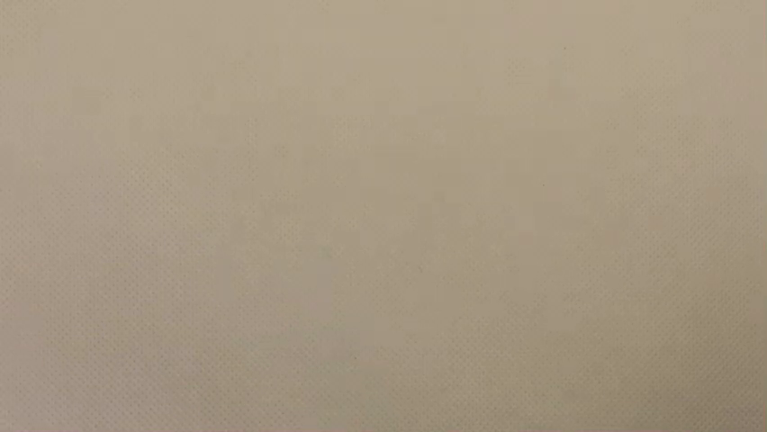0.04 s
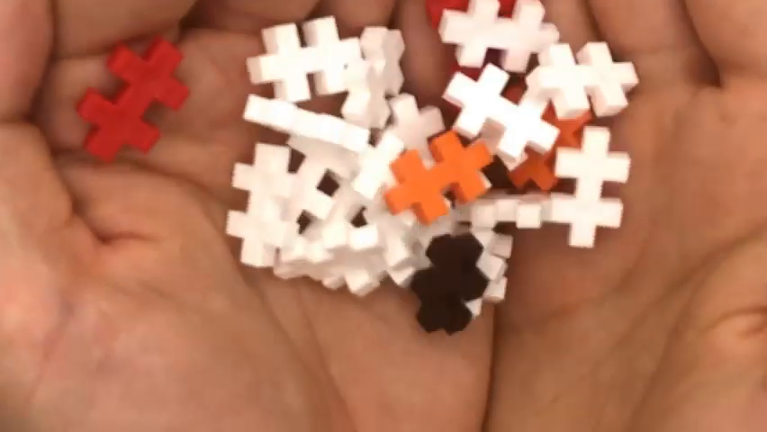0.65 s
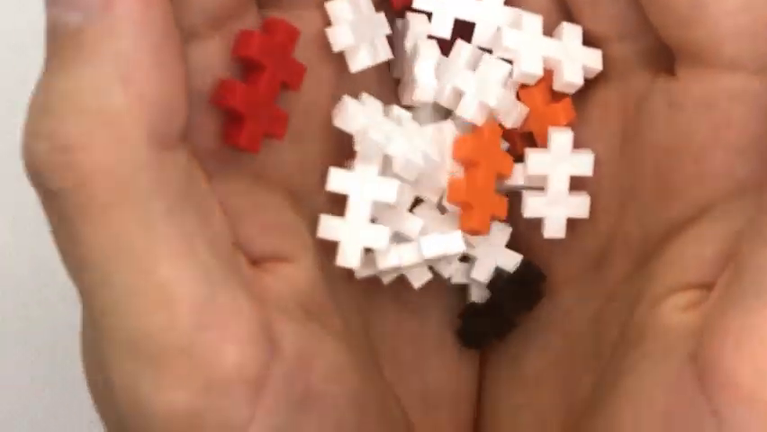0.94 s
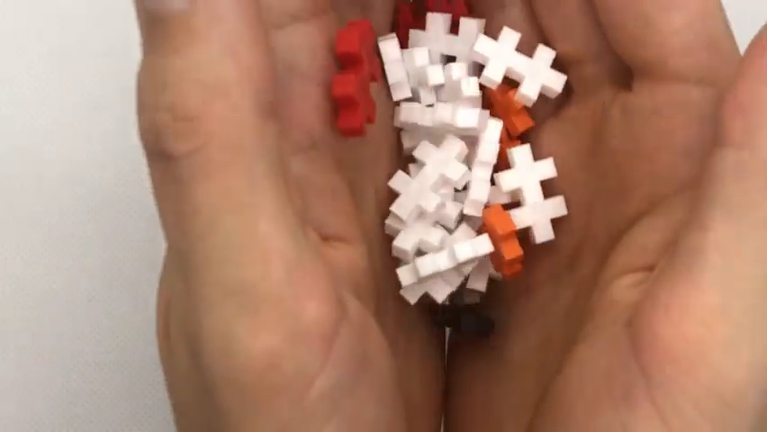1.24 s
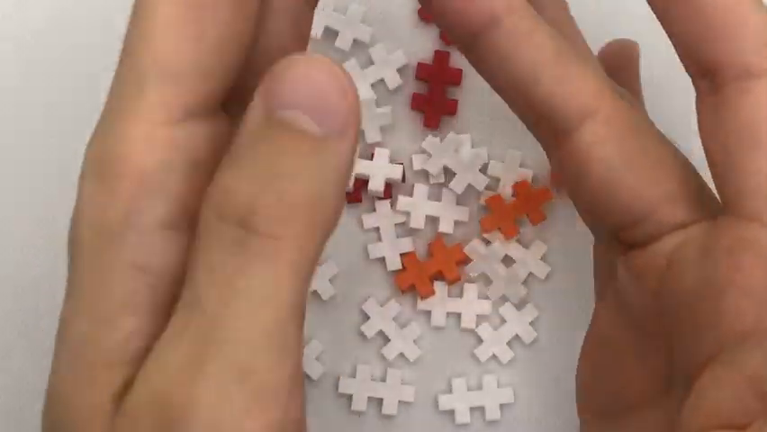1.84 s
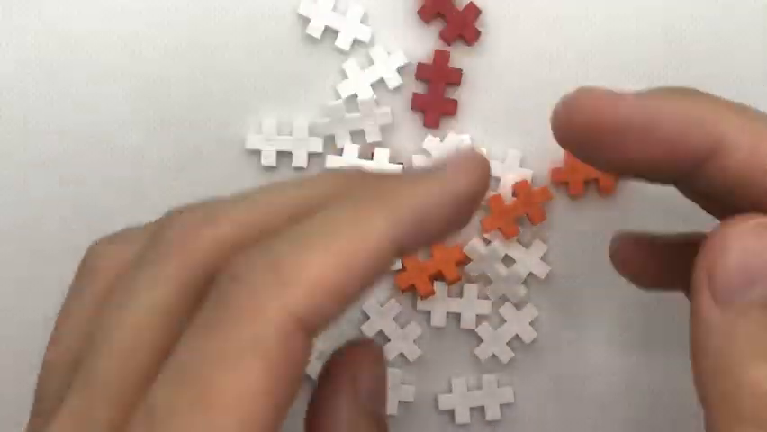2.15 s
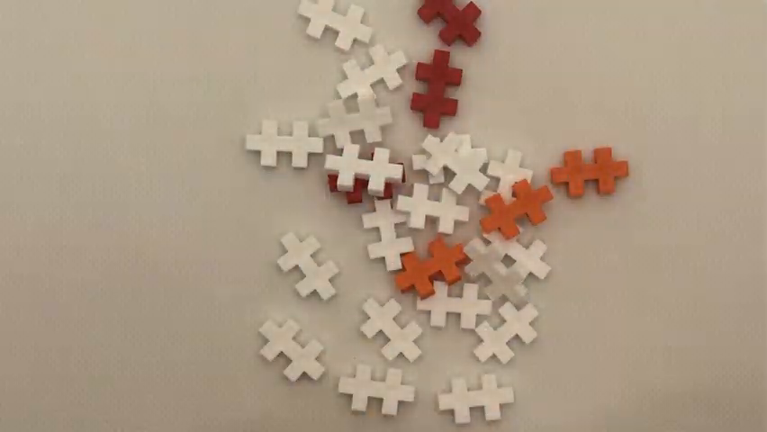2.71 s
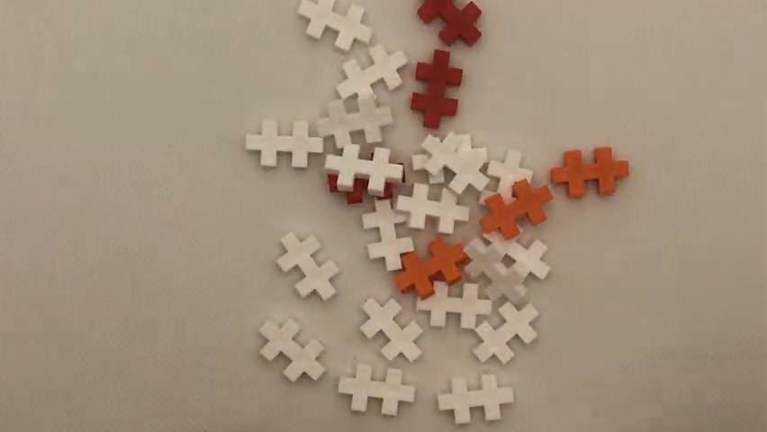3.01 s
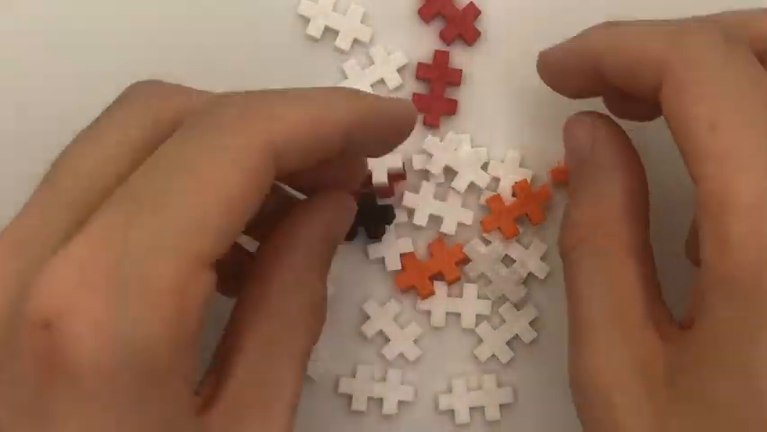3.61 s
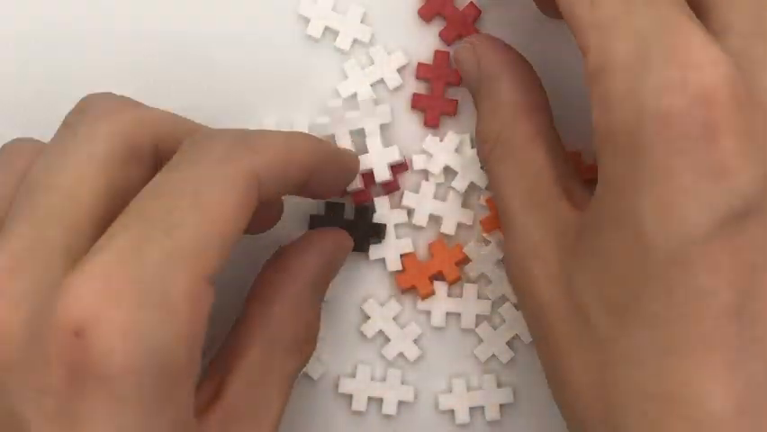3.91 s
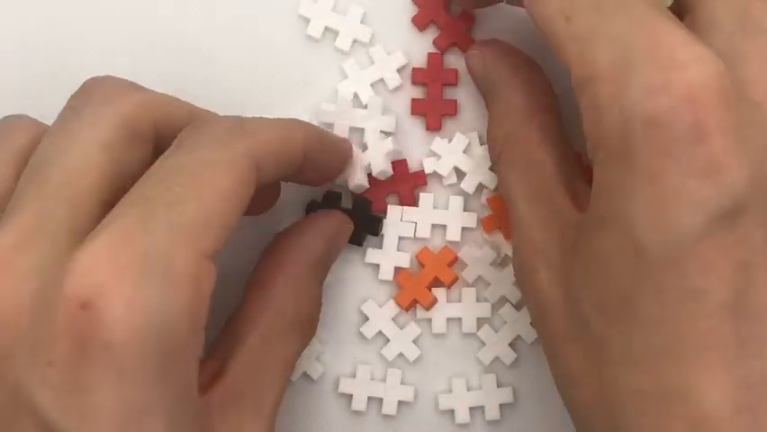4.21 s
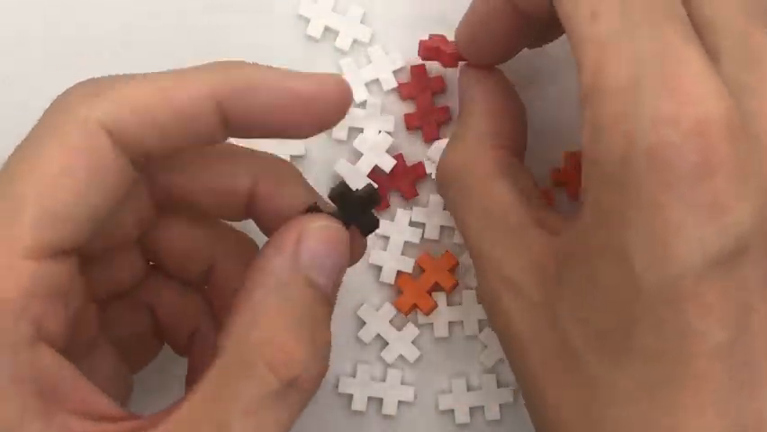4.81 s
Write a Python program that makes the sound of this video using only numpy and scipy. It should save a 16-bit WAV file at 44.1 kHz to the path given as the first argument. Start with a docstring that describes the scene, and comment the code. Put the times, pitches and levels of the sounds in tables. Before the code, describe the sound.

A handful of little plastic pieces shifts softly, drops on a table in a short clatter, and is lightly pushed around.

```python
"""Small plastic building pieces pour onto a tabletop, after shifting in cupped hands; fingertips then nudge them.
Each impact on the table excites the board's bending modes, which ring briefly. Piece on piece gives
a thin bright click, and stick-slip friction makes the pieces rustle and scrape. Underneath, the table
rumbles under the hands and sleeves brush by, close to one microphone in a quiet small room."""
import sys
import numpy as np
from scipy import signal
from scipy.fft import rfft, irfft
from scipy.io import wavfile

SR = 44100
rng = np.random.default_rng(int(sys.argv[2]) if len(sys.argv) > 2 else 0)


def store_pcm(level_fs):
    """Save levels as 16-bit WAV."""
    pcm = np.round(np.clip(level_fs, -1, 1) * 32767).astype(np.int16)
    wavfile.write(sys.argv[1], SR, np.atleast_2d(pcm).T)


N = 222741
T = np.arange(6000) / SR  # time axis of one impact

# pieces striking the table: start_s, level_db, hardness_db, spot_ring_db, crack_pitch_hz
TABLE_IMPACTS = [(1.379, -34.5, -10, -7, 3100), (1.3924, -35, -10, -0.5, 2370), (1.4056, -47, 1, -12, 5300),
                 (1.422, -41.5, -3.5, -11, 2424), (1.4395, -40, -8, -4, 2250),
                 (1.4428, -42.5, -3, 10, 2335), (1.4501, -41.5, 2, 10, 2250), (1.4577, -36, -7, -3, 2450),
                 (1.4639, -33.5, -3, -1.5, 2710), (1.4704, -39.5, 2, 6, 2350), (1.479, -46, 5, 0, 2230),
                 (1.485, -34.5, 3.5, 3, 3030), (1.489, -38.5, 0.5, -1, 2858),
                 (1.5015, -36.5, 2.5, -7, 2572), (1.5065, -40.5, 1.5, -4, 2530),
                 (1.5135, -42, 1.5, 5, 2710), (1.518, -39, 7, 3.5, 2700), (1.5361, -43, 0.5, -3.5, 2570),
                 (1.599, -42, -5, 0, 2540), (1.6044, -40, 6.5, 11.5, 2820), (1.667, -48, 0.5, -7, 3080),
                 (1.675, -47, -3, -9, 2620), (1.775, -60, 4, 1.5, 2500), (2.76, -71.5, -5, -17, 2360),
                 (3.5564, -49, -1, -5.5, 5070), (3.5603, -53.5, 7.5, -3.5, 2420),
                 (3.6039, -54.5, -4, -18, 2860), (3.649, -60.5, -3.5, -7, 3110), (3.8972, -69, -2, 0, 3830),
                 (3.977, -64.5, -3, -1, 3000), (3.9833, -62, -1, -3.5, 3020), (4.016, -62, -1, 3, 3780),
                 (4.0717, -56.5, -3.5, -14, 2900), (4.348, -49.5, 0.5, 0.5, 3560),
                 (4.3976, -72, 9, 6.5, 2260), (4.5318, -66, 4.5, 4, 3540), (4.655, -70, 1, -6.5, 2620)]
# spectrum of the board's many weak modes: frequency_hz, level_db
WEAK_MODE_SPECTRUM = [(250, -25.5), (450, 8), (800, 4.5), (1000, -4), (1400, -7), (2000, -8.5), (2600, -39)]
# spectrum of the contact's crack: pitch_ratio, level_db
CRACK_SPECTRUM = [(.4, -28.5), (.7, -4), (.9, 3), (1, 1), (1.15, -4.5), (1.5, -11.5), (2, -16), (2.6, -17),
                  (4, -36.5)]

def table_impacts(ring_db=1, thud_db=-2, crack_db=-2.5, snap_db=-15, weak_modes_db=-2, full_drop_db=-38):
    """Impact excitation: a harder contact puts less energy into the thud, more into crack and snap."""
    out = np.zeros(N)
    for start_s, level_db, hardness_db, spot_db, pitch_hz in TABLE_IMPACTS + bounces():
        thud, knock, ring = board_modes()
        weak_modes = amp(weak_modes_db) * burst(WEAK_MODE_SPECTRUM, t60_s=0.037, rise_s=0.0005)
        knock = unit_onset(knock + weak_modes)
        crack = burst(CRACK_SPECTRUM, t60_s=0.038, rise_s=0.00034, unit_hz=pitch_hz)
        snap = piece_snap(t60_s=0.026, rise_s=0.0005)
        # soft contacts and light nudges sound duller
        dullness_db = -0.41 * hardness_db + 0.2 * (full_drop_db - level_db)
        table = amp(thud_db + dullness_db) * thud + knock + amp(ring_db + spot_db) * ring
        piece = amp(crack_db + hardness_db) * crack + amp(snap_db + 1.15 * hardness_db) * snap
        add(out, start_s, amp(level_db) * (table + piece))
    return out


# bending modes of the tabletop: frequency_hz, level_db, t60_s
BOARD_MODES = [(133.3, -8, .075), (179.2, -2, 0.058), (215.8, 0.5, 0.08), (338, -6.5, 0.04),
               (362.55, -7.5, 0.025), (502.8, -15, 0.04), (562, -7.5, 0.033), (664, 1, .04),
               (864, -5, 0.039), (1156, -2.5, 0.064), (1262, -11, 0.071), (1750, -8, 0.071),
               (1685, 6, 0.024), (1766, -0.5, 0.044), (2105, -21, 0.077)]

def board_modes(spread_db=5, detune=0.0064, thud_below_hz=420, ring_above_hz=1500):
    """Modal superposition: the point of impact weights each mode. Returns thud, knock and ring."""
    hz, db, t60_s = np.transpose(BOARD_MODES)
    weight, shift, phase = rng.standard_normal((3, len(hz), 1))
    decay = amp(db[:, None] + spread_db * weight - 60 * T / t60_s[:, None])
    modes = decay * np.sin(2 * np.pi * (hz[:, None] * (1 + detune * shift) * T + phase))
    low, high = hz < thud_below_hz, hz > ring_above_hz
    bands = [(low, 0.002), (~low & ~high, 0.0006), (high, 0.00036)]  # bending waves take time to spread
    return [unit_onset(modes[band].sum(0) * (1 - np.exp(-T / rise_s))) for band, rise_s in bands]


def bounces(count=11, from_s=1.552, to_s=1.69, first_db=-46, fade_db_per_s=-61,
            jitter_s=0.0025, ring_db=-6, scatter_db=4, pitch_hz=2620, scatter_oct=0.25):
    """Inelastic rebound: the landed heap settles in ever weaker impacts at uneven intervals."""
    times = np.linspace(from_s, to_s, count)
    return [(s + jitter_s * late, first_db + fade_db_per_s * (s - from_s), scatter_db * hard,
             ring_db + scatter_db * spot, pitch_hz * 2 ** (scatter_oct * high))
            for s, (late, hard, spot, high) in zip(times, rng.standard_normal((count, 4)))]


# spectrum of a piece's bright snap: frequency_hz, level_db
SNAP_SPECTRUM = [(2500, -21.5), (4300, 4), (5500, 0.5), (6800, -1.5), (8200, 5.5), (10300, -5.5),
                 (12300, -1), (14500, -6.5), (16000, -6)]

def piece_snap(t60_s, rise_s):
    """Damped free vibration: the high modes of a struck piece die out quickly."""
    return burst(SNAP_SPECTRUM, t60_s, rise_s)


# collisions between two pieces: start_s, level_db, pitch_hz
COLLISIONS = [(0.2854, -52.5, 8500), (0.312, -68, 4250), (0.3217, -55.5, 13600), (0.3887, -67.5, 8900),
              (0.418, -69.5, 12000), (0.5022, -57, 5200), (0.515, -59, 6980), (0.5206, -71, 3800),
              (0.5295, -53, 9000), (0.5495, -60, 8330), (0.566, -68, 6000), (0.6195, -63.5, 5340),
              (1.0435, -73.5, 2550), (1.1009, -70.5, 3500), (1.1142, -71.5, 4240), (1.177, -80.5, 2780),
              (1.304, -73.5, 3920), (1.3657, -60.5, 4300), (1.4087, -56.5, 5350), (1.667, -55.5, 8700),
              (1.7305, -68, 9000), (1.773, -63, 7400), (2.791, -71.5, 5600), (3.1533, -66.5, 8000),
              (3.18, -71, 5800), (4.2054, -73.5, 3770), (4.326, -68, 3800), (4.4928, -70.5, 4350),
              (4.5314, -63.5, 7550)]
# spectrum of a piece's strongest resonance: pitch_ratio, level_db
RESONANCE_SPECTRUM = [(.6, -35), (.88, -19), (1, -0.5), (1.12, -14.5), (1.6, -30)]
# spectrum of a piece's dull body: frequency_hz, level_db
BODY_SPECTRUM = [(500, -14), (1100, 0), (1800, -0.5), (2770, 1), (4300, -7), (5500, -13.5), (8000, -34)]

def piece_clicks(snap_db=-1, peak_db=-3, body_db=-1, snap_db_per_oct=2, body_db_per_oct=-14.5, pivot_hz=4940):
    """Damped resonance of colliding pieces: the higher the click, the more snap and the less body."""
    out = np.zeros(N)
    for start_s, level_db, pitch_hz in COLLISIONS + jostles():
        octaves = np.log2(pitch_hz / pivot_hz)
        snap = amp(snap_db + snap_db_per_oct * octaves) * piece_snap(t60_s=0.034, rise_s=0.0001)
        peak = amp(peak_db) * burst(RESONANCE_SPECTRUM, t60_s=0.034, rise_s=0.00029, unit_hz=pitch_hz)
        body = amp(body_db + body_db_per_oct * octaves) * burst(BODY_SPECTRUM, t60_s=0.029, rise_s=0.00026)
        add(out, start_s, amp(level_db) * (snap + peak + body))
    return out


# pieces tumbling over each other on the table: start_s, length_s, level_db
TUMBLES = [(1.438, 0.14, -32), (1.6, .11, -47)]
# spectrum of the tumbling: frequency_hz, level_db
TUMBLE_SPECTRUM = [(80, -11.5), (215, 11.5), (400, -3.5), (670, 7), (950, -4), (1160, 6), (1400, -6),
                   (1730, 13), (2100, -7.5), (2550, -2.5), (4000, -10.5), (8000, -20), (15000, -32.5)]

def tumbling():
    """Superposed micro-impacts: tumbling pieces merge into a fading clatter."""
    envelope = strokes(TUMBLES, attack_s=0.009, swell_db=-17, release_s=0.015)
    return envelope * coloured(stick_slip(per_s=320, spread_db=2.5, t60_s=0.0085), TUMBLE_SPECTRUM)


# a fingertip sliding pieces over the table: start_s, length_s, level_db
FINGER_SLIDES = [(3.89, 0.032, -70.5), (3.935, 0.072, -62), (4.16, 0.12, -64.5), (4.395, 0.014, -61.5),
                 (4.615, 0.045, -73)]
# spectrum of plastic grating on the board: frequency_hz, level_db
SLIDE_SPECTRUM = [(100, -16.5), (215, 17), (400, -8.5), (670, 2), (950, -8), (1160, -4), (1400, -14),
                  (1730, 5.5), (2100, -6.5), (3800, -7.5), (5000, -13.5), (8000, -20), (15000, -33)]

def sliding():
    """Sliding friction: the scrape swells as the finger pushes harder."""
    envelope = strokes(FINGER_SLIDES, attack_s=0.0068, swell_db=12.5, release_s=0.011)
    return envelope * coloured(stick_slip(per_s=760, spread_db=-1.5, t60_s=0.033), SLIDE_SPECTRUM)


# pieces shifting against each other and settling: start_s, length_s, level_db
RUSTLES = [(0.331, 0.17, -68.5), (0.491, 0.099, -61.5), (0.599, 0.027, -64), (0.653, .02, -69),
           (0.827, 0.0078, -72.5), (0.9, 0.049, -73.5), (0.976, 0.021, -68.5), (1.031, 0.048, -77.5),
           (1.098, 0.12, -74.5), (1.279, .07, -74), (2.547, .02, -73.5), (2.621, 0.018, -71),
           (2.78, 0.023, -74), (3.067, .03, -73), (3.141, 0.032, -68.5)]
# spectrum of pieces rubbing in the palms: frequency_hz, level_db
RUSTLE_SPECTRUM = [(300, -11), (1100, -1.5), (2800, 2), (5500, -0.5), (8200, -2), (10500, -10), (13000, -7),
                   (16000, -16)]

def rustling():
    """Friction of plastic on plastic: many small slips blend into a bright rustle."""
    envelope = strokes(RUSTLES, attack_s=0.0045, swell_db=0.5, release_s=0.016)
    return envelope * coloured(stick_slip(per_s=560, spread_db=1, t60_s=0.014), RUSTLE_SPECTRUM)


def jostles(per_s=22, offset_db=-6, scatter_db=3, pitch_hz=5040, scatter_oct=0.44):
    """Random collisions: shifting pieces click faintly during the rustles."""
    return [(start_s + length_s * rng.random(), db + offset_db + scatter_db * rng.uniform(-0.92, 1),
             pitch_hz * 2 ** (scatter_oct * rng.uniform(-1, 1)))
            for start_s, length_s, db in RUSTLES for _ in range(round(length_s * per_s))]


def stick_slip(per_s, spread_db, t60_s):
    """Stick-slip friction: edges catch and let go in tiny random impacts whose powers add."""
    sizes = amp(spread_db * np.minimum(rng.exponential(1, N), 3))
    slips = sizes * (rng.random(N) < per_s / SR)
    power = signal.oaconvolve(slips ** 2, amp(-60 * T / t60_s) ** 2)[:N]
    return np.sqrt(abs(power)) * rng.standard_normal(N)


# hands leaning on the table and easing off: start_s, length_s, level_db
HAND_PRESSES = [(1.37, 0.34, -46.5), (1.46, .1, -41.5), (2.75, 0.11, -64.5), (3.89, 0.28, -55.5),
                (4.23, 0.29, -57), (4.52, 0.16, -61.5)]
# spectrum of the table's rumble: frequency_hz, level_db
RUMBLE_SPECTRUM = [(12, -6), (25, 1), (40, -0.5), (60, -11.5), (90, -11.5), (130, -11), (200, -16),
                   (400, -60)]

def hand_rumble():
    """Forced vibration: the table rumbles under the load of the hands."""
    return strokes(HAND_PRESSES, attack_s=0.033, swell_db=-10.5, release_s=0.03) * noise(RUMBLE_SPECTRUM)


# hands and sleeves brushing past: start_s, length_s, level_db
SLEEVE_PASSES = [(0, 0.56, -72.5), (1.95, .45, -87), (3.2, 0.39, -80)]
# spectrum of rubbing cloth: frequency_hz, level_db
CLOTH_SPECTRUM = [(60, 5), (200, 2.5), (800, 10), (2000, 4), (5000, -1.5), (7500, 1), (10000, -4.5),
                  (15000, -20)]

def sleeves():
    """Friction noise of cloth: each pass comes and goes in one smooth arch."""
    t = np.arange(N) / SR
    envelope = sum(amp(db) * np.sin(np.pi * np.clip((t - start_s) / length_s, 0, 1))
                   for start_s, length_s, db in SLEEVE_PASSES)
    return envelope * noise(CLOTH_SPECTRUM)


# reverberation time of the room: frequency_hz, t60_s
REVERB_TIMES = [(120, 0.1), (500, 0.64), (2000, 0.21), (6000, 0.39), (15000, 0.1)]
# spectrum of the reverberant tail: frequency_hz, level_db
REVERB_SPECTRUM = [(120, -5.5), (500, -13), (2000, -11.5), (6000, -11.5), (15000, -23)]

def reverberation(x, delay_s=0.02, reflections_per_s=3000):
    """Diffuse reflection: scattered wall echoes decay exponentially, each band at its own rate."""
    taps = rng.standard_normal(SR) * (rng.random(SR) < reflections_per_s / SR)
    taps *= np.arange(SR) > delay_s * SR
    hz, t, bands = signal.stft(unit_rms(taps), SR, nperseg=256)
    t60_s = curve_at(REVERB_TIMES, hz)[:, None]
    unit_energy = np.sqrt(2 * np.log(1000) / (t60_s * SR))
    decay = amp(curve_at(REVERB_SPECTRUM, hz)[:, None] - 60 * t / t60_s)
    tail = signal.istft(bands * unit_energy * decay, SR, nperseg=256)[1]
    return signal.fftconvolve(x, tail)[:N]


# spectrum of the room's hush: frequency_hz, level_db
HUSH_SPECTRUM = [(16, -16), (30, 2.5), (60, -10), (142, -23), (250, -14.5), (340, -22), (520, -33.5),
                 (650, -30), (933, -31), (1430, -34.5), (2360, -38), (3000, -41.5), (16000, -46.5)]

def room_hush(level_db=-67.5):
    """Ambient noise floor: a steady hush, strongest in the bass."""
    return amp(level_db) * noise(HUSH_SPECTRUM)


def burst(spectrum, t60_s, rise_s, unit_hz=1):
    """Modal overlap: crowded damped modes act as decaying noise; edges chatter into contact over rise_s."""
    envelope = (1 - np.exp(-T / rise_s)) * amp(-60 * T / t60_s)
    return unit_onset(coloured(rng.standard_normal(len(T)), spectrum, unit_hz) * envelope)


def strokes(events, attack_s, swell_db, release_s):
    """Amplitude envelope: each stroke sets in, changes by swell_db over its length, then dies away."""
    gain = np.zeros(N)
    for start_s, length_s, db in events:
        t = np.arange(N) / SR - start_s
        attack = np.clip(t / attack_s, 0, 1)
        hold = amp(db + swell_db * (np.clip(t / length_s, 0, 1) - 0.5))
        release = np.exp(-np.maximum(t - length_s, 0) / release_s)
        gain += attack * hold * release
    return gain


def noise(spectrum):
    """Stationary Gaussian noise with the given spectrum."""
    return coloured(rng.standard_normal(N), spectrum)


def coloured(x, spectrum, unit_hz=1):
    """Spectral shaping to rms 1; the spectrum's frequencies are multiples of unit_hz."""
    hz = np.fft.rfftfreq(len(x), 1 / SR)
    return unit_rms(irfft(rfft(x) * amp(curve_at(spectrum, hz / unit_hz)), len(x)))


def curve_at(points, hz):
    """Interpolation on a log-frequency axis."""
    frequencies, values = np.transpose(points)
    return np.interp(np.log(hz + 1e-9), np.log(frequencies), values)


def amp(db):
    """Decibels to amplitude ratio."""
    return 10 ** (np.asarray(db) / 20)


def unit_rms(x):
    """Normalisation to rms 1."""
    return x / np.sqrt(np.mean(x ** 2) + 1e-20)


def unit_onset(x):
    """Normalisation of an impact to rms 1 over its first 7 ms."""
    return x / np.sqrt(np.mean(x[:300] ** 2) + 1e-20)


def add(mix, start_s, sound):
    """Superposition of a sound on the mix at start_s."""
    part = mix[max(round(start_s * SR), 0):][:len(sound)]
    part += sound[:len(part)]


def scene():
    """Superposition of direct sound, reverberation and the room's hush."""
    impacts = table_impacts() + piece_clicks()
    friction = amp(-4) * rustling() + amp(-12) * tumbling() + amp(-2) * sliding()
    hands = amp(-2) * hand_rumble() + sleeves()
    direct = impacts + friction + hands
    hush = room_hush()
    return (direct + reverberation(direct) + hush)[None]


def record(dry, cutoff_hz=15750):
    """Band limiting: a linear-phase low-pass removes the highest treble."""
    low_pass = signal.firwin(401, cutoff_hz, window=("kaiser", 9), fs=SR)
    return signal.oaconvolve(dry, low_pass[None], "same")


dry = scene()
out = record(dry)
store_pcm(out)
```